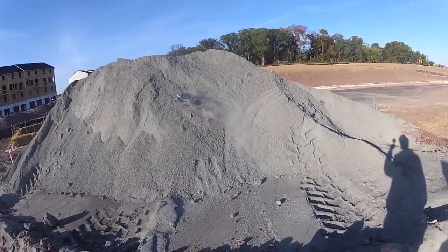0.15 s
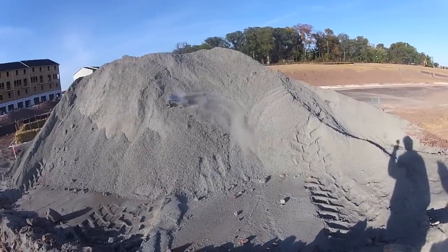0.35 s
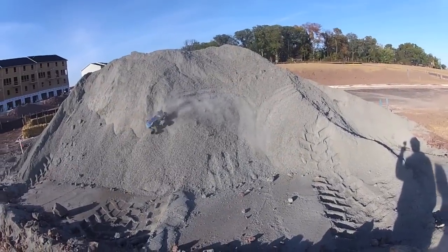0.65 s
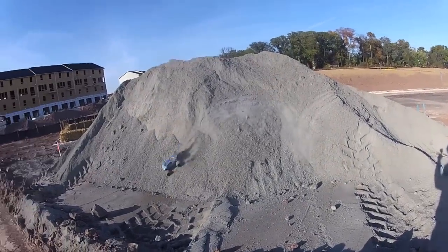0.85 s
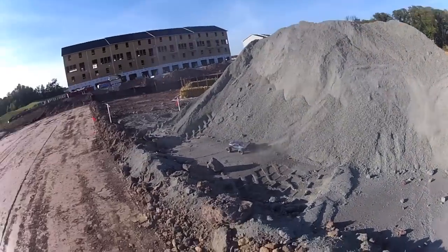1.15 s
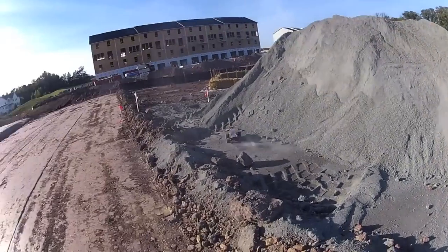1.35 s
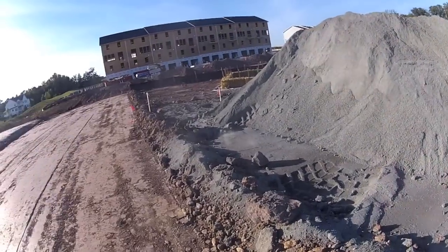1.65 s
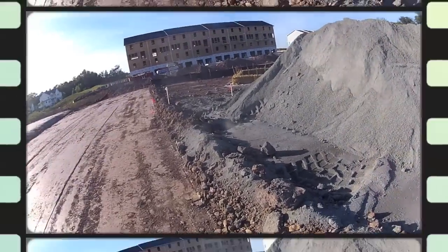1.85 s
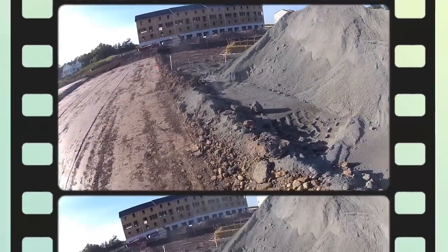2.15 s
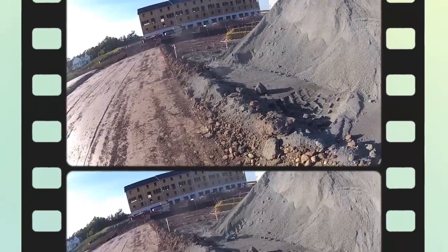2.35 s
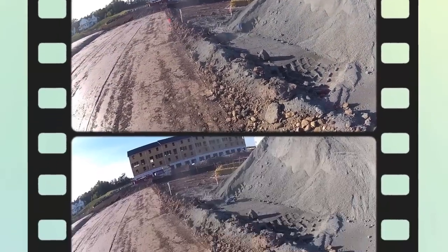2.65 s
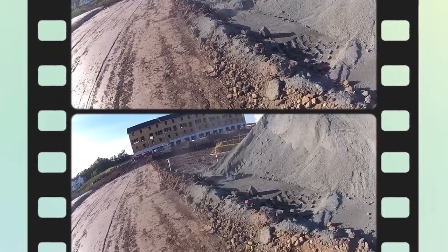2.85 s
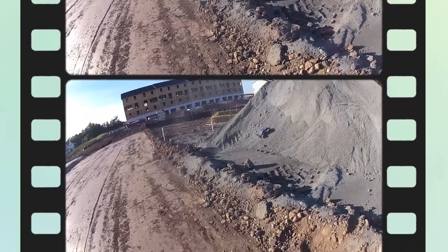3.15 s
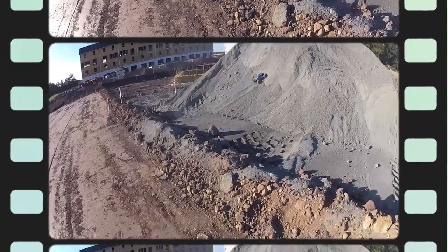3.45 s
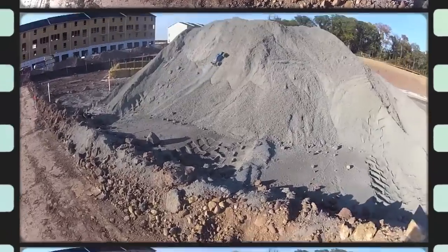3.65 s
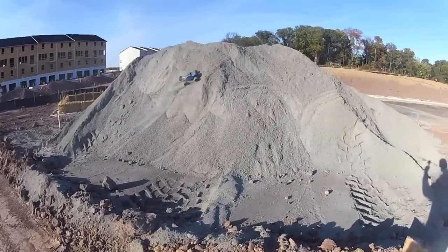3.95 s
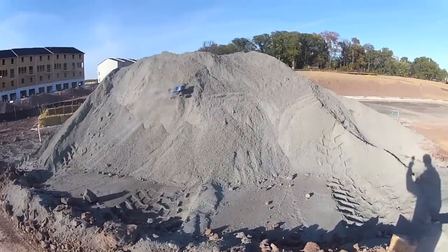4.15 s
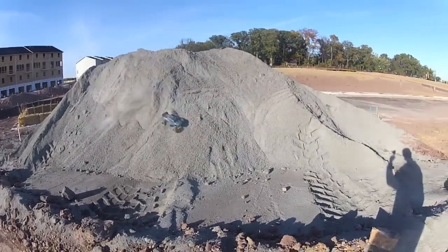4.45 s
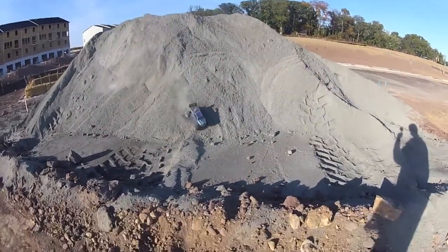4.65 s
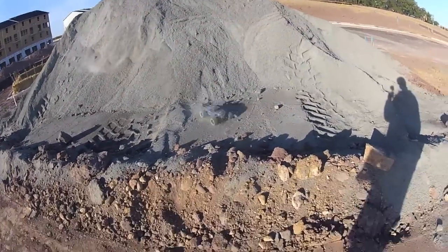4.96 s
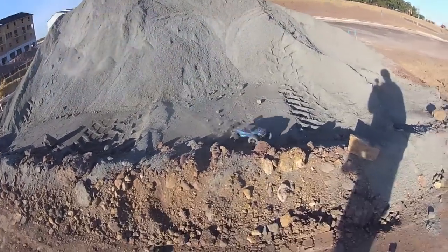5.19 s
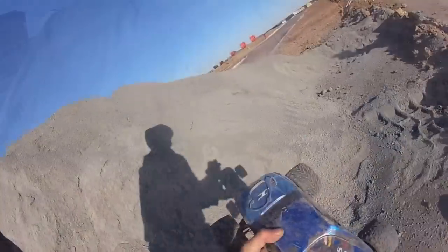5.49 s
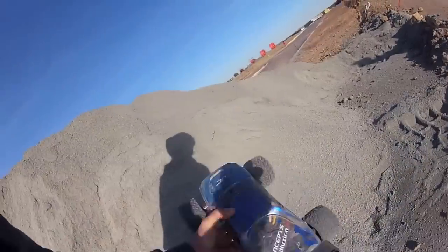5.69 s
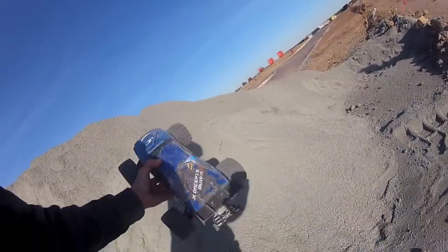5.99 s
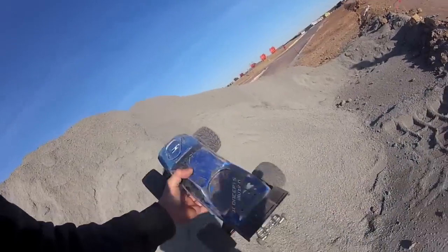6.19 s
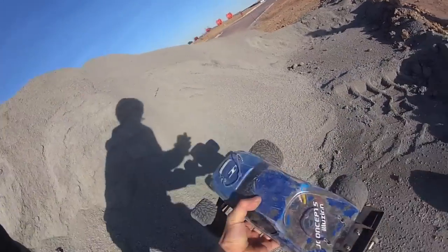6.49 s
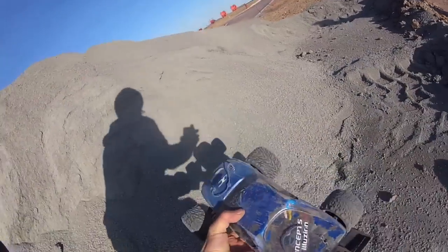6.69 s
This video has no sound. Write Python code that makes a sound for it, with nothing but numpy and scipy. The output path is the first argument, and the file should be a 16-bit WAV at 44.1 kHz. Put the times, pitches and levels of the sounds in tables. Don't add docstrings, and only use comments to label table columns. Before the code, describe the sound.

Thin wavering motor whine and gritty gear rasp outdoors, broken by sharp plastic knocks, a mid-scene fade to silence, then close shell rattles.

```python
import sys
import numpy as np
from scipy import signal
from scipy.fft import rfft, irfft
from scipy.io import wavfile

SR = 44100
rng = np.random.default_rng(int(sys.argv[2]) if len(sys.argv) > 2 else 0)


def master_out(mix):
    frames = np.transpose(np.atleast_2d(mix))
    ceiling = np.clip(frames, -1, 1)
    pcm = np.round(ceiling * 32767).astype(np.int16)
    wavfile.write(sys.argv[1], SR, pcm)


def gain_from_db(level_db):
    decades = np.asarray(level_db, float) / 20
    return 10 ** decades


N = 301203

# t/s, motor level/dB, whine f/Hz, gear load/dB, tyre level/dB
FIRST_RUN = [(0.0, -57, 2200, -11.5, -63.5), (0.5, -60.5, 2270, -8, -63.5), (0.84, -67, 2320, -3.5, -70),
             (1.11, -59, 2250, -9, -68.5), (1.36, -66, 2230, -2.5, -64.5), (1.6, -69.5, 2200, -9, -77),
             (1.88, -76, 2195, -3, -85), (2.14, -65.5, 2200, 3, -63.5), (2.52, -79, 2200, -5, -92)]
# t/s, motor level/dB, whine f/Hz, gear load/dB, tyre level/dB
SECOND_RUN = [(2.949, -68.5, 2250, 1, -64), (3.5, -63, 2260, 4, -67), (3.74, -60.5, 2280, -2.5, -66),
              (4.17, -61, 2290, -5, -66), (4.53, -62.5, 2300, 1, -60), (4.68, -67.5, 2200, -5.5, -72.5),
              (4.92, -71.5, 2247, -0.5, -71), (5.1, -62, 2320, 1.5, -64), (5.33, -65, 2216, -2, -69.5)]
# t/s, motor level/dB, whine f/Hz, gear load/dB, tyre level/dB
IN_HAND = [(5.46, -59.5, 2202, -8, -66), (5.73, -57, 2225, -7, -58.5), (5.92, -59.5, 2200, -7.5, -61.5),
           (6.74, -55.5, 2228, -7.5, -60), (6.83, -55.5, 2175, -10, -62)]
# t/s, motor change/dB, tyre change/dB, length/s
STUMBLES = [(0.737, -6, -3, 0.06), (0.81, 2, 2, 0.045), (0.92, -13, -19, 0.048), (0.998, -7, -6, 0.022),
            (1.016, 6.5, 6, 0.026), (1.062, -4, -1, .04), (1.935, 10.5, 10, 0.032), (2.0, -0.5, 1, 0.066),
            (3.883, 1, 0, 0.044), (4.576, 9, 13.5, 0.019), (4.75, -3, -13, 0.025), (4.776, 2, 15.5, 0.012),
            (4.811, 8.5, 8, 0.044), (4.85, -6, 0, 0.016), (5.04, 2, 3.5, 0.047), (5.146, -0.5, 6.5, 0.048),
            (5.644, 6, 2, 0.028), (6.808, 5, 3, 0.024)]
# start t/s, end t/s, gain/dB
ROUGH_GROUND = [
    (0.0, 0.62, -6),
    (4.1, 4.5, -4),
    (0.86, 0.962, 6),
    (1.224, 1.618, 4.5),
    (1.662, 2.3, 6),
    (3.056, 3.646, 8.5),
    (4.55, 4.6, 11),
    (4.78, 4.947, 9.5),
]
# f/Hz, width/Hz, level/dB
GRIT_PANELS = [(4183, 380, -8), (4670, 1300, -6), (5030, 300, -2.5), (5410, 440, -3), (5910, 280, -6.5)]
# start t/s, end t/s, gain/dB
SQUEEZES = [
    (0.0, 0.6, -3),
    (5.513, 5.816, 6),
    (6.437, 6.83, 6.5),
]
# t/s, peak level/dB, f/Hz, length/s
STONES = [(0.066, -59, 5330, 0.0092), (0.674, -55, 3630, 0.012), (0.7193, -54, 5100, 0.013),
          (1.344, -54, 5360, 0.013), (1.7, -64, 5470, 0.014), (1.92, -49.5, 5270, 0.005),
          (2.074, -53, 5270, 0.016), (2.37, -57, 5500, 0.01), (2.469, -56.5, 5410, 0.0071),
          (3.077, -54, 5350, 0.016), (3.144, -44, 5600, 0.0088), (3.513, -49.5, 3680, 0.012),
          (3.817, -58, 5080, 0.014), (3.8685, -49.5, 5030, 0.0089), (4.227, -53, 3600, 0.011),
          (4.5617, -43.5, 3750, 0.012), (4.596, -47, 5970, 0.015), (4.7704, -43.5, 3520, 0.0089),
          (4.801, -54, 3950, 0.015), (4.8566, -47.5, 5440, 0.01), (5.195, -52, 4980, 0.011),
          (5.2425, -49, 5890, 0.013), (5.281, -48.5, 5900, 0.012), (5.3094, -51.5, 6050, 0.013),
          (6.551, -47.5, 5030, 0.012), (1.248, -58, 4500, 0.013), (1.297, -55, 5600, 0.012),
          (1.462, -60, 5300, 0.01), (2.445, -60, 5500, 0.009)]
# t/s, peak level/dB, f/Hz, length/s
RATTLES = [(0.704, -47, 2240, 0.013), (0.798, -54, 2420, 0.029), (4.5665, -44, 2660, 0.0082),
           (4.799, -44.5, 2605, 0.031), (5.55, -37.5, 2200, 0.01), (5.644, -33.5, 1977, 0.013),
           (5.7284, -37.5, 2005, 0.027), (5.761, -37, 2030, 0.016), (5.875, -39.5, 1960, 0.027),
           (5.946, -39, 2035, 0.016), (6.078, -35.5, 2065, 0.015), (6.151, -38.5, 1986, 0.016),
           (6.3854, -39.5, 2053, 0.017), (6.5543, -40, 2250, 0.013)]
# start t/s, end t/s, level/dB, f/Hz, width/Hz
DRUMMING = [(4.98, 5.22, -68.5, 720, 190), (5.58, 5.72, -67, 824, 220), (1.32, 1.36, -69, 670, 220),
            (0.0, 0.68, -70, 1060, 100), (4.19, 4.56, -70, 3620, 120), (1.02, 1.2, -71, 4700, 500),
            (0.0, 0.5, -70, 5150, 300), (5.6, 6.9, -63, 3000, 1000), (5.68, 5.8, -62, 3600, 250),
            (4.3, 4.55, -72, 1450, 400), (2.76, 2.8, -68, 3050, 100), (6.76, 6.9, -57.5, 180, 125),
            (4.79, 4.84, -62, 1300, 450)]
# t/s, peak level/dB, thump re peak/dB, snap re peak/dB
KNOCKS = [(0.8152, -56.5, 14.5, -10), (0.928, -48, 2, -1.5), (2.205, -46.5, 0, 0.5),
          (2.2786, -26.5, 10, 9.5), (2.296, -34, 4.5, -8), (2.309, -39, 2, -5.5), (2.319, -36.5, 4, -2.5),
          (3.926, -38.5, -10, -5), (3.98, -39.5, 3, -10), (4, -10.5, -5, -12.5), (4.0088, -33, -18, 2.5),
          (4.037, -26, 1, -16.5), (4.680, -47, 0, -2), (4.696, -47, -20, -1), (4.7015, -15.5, -4, -10.5)]
# t/s, level/dB
RUB = [(2.268, -73), (2.275, -52), (2.284, -38), (2.296, -50), (2.315, -55), (2.328, -63), (2.345, -76.5)]
# f/Hz, level/dB, t60/s
WALL_MODES = [(662, -17.5, 0.044), (1000, -7, 0.0052), (1070, -3.5, 0.027), (1275, -14, 0.036),
              (1570, -9, 0.0074), (1770, -4, 0.0082)]
# f/Hz, level/dB, t60/s
SNAP_MODES = [(1840, -11, 0.012), (2200, 7.5, 0.0094), (2765, -10.5, .01), (3245, -7.5, 0.0053),
              (3494, -6.5, 0.027), (4540, -27.5, .006), (5080, -20.5, 0.0033)]
# f/Hz, level/dB, t60/s
THUMP_MODES = [(117, -6.5, 0.043), (205, 3.5, 0.017)]
# t/s, buffeting level/dB
WIND = [(0.0, -62.5), (0.83, -64), (1.12, -57.5), (1.45, -66.5), (1.97, -69.5), (2.25, -53), (2.38, -65.5),
        (2.6, -66), (3.0, -67), (3.4, -63), (3.75, -58), (4.35, -61.5), (4.74, -56), (5.08, -63),
        (5.5, -69.5), (6.7, -62), (6.83, -55)]
# f/Hz, level per Hz/dB
RUSH = [(60, -0.5), (150, 1), (300, -2), (450, -7), (700, -11), (1500, -18.5), (3000, -22.5), (6000, -21)]
# f/Hz, level per Hz/dB
SIDE_HISS = [(15, -29.5), (25, 9), (2210, -16), (4800, -16), (5900, -33), (7670, -62.5), (13000, -120)]

CUT_S, LIFTED_S, LIFT_S = 2.838, 5.36, 0.1


def whirr():
    level_db, whine_hz, load_db, _, lifted = drive()
    flutter_db = 1.2 * drift(27)
    running = np.arange(N) / SR < LIFTED_S

    jittered_hz = whine_hz + 55 * drift(45)
    tone = np.sqrt(2) * np.sin(2 * np.pi * np.cumsum(jittered_hz) / SR)
    whine = gain_from_db(-8.0) * running * tone
    whine = whine + gain_from_db(-2.5) * band_around(whine_hz, width_hz=240, per_s=4000, spread_db=4.5)
    whine = whine + gain_from_db(-12) * band_around(whine_hz, width_hz=480, per_s=4000, spread_db=6.0)

    mesh_hz = 2661 + 6.0 * load_db + 30.0 * drift(3.3)
    mesh_db = level_db + load_db + 0.4 * drift(5.2)
    mesh = band_around(mesh_hz, width_hz=237, per_s=3700, spread_db=0.5)
    mesh = mesh + gain_from_db(-5.5) * twice(grains(2500, 3.3), 2970, 210)

    chassis_db = level_db - 8.5 + 0.4 * load_db + 12.5 * lifted
    chassis_db = chassis_db + sum(db * spell(start, end) for start, end, db in ROUGH_GROUND)
    chassis_db = chassis_db + 1.7 * drift(8) + 0.45
    chassis = twice(grains(4000, 3.4), 1980, 340) + gain_from_db(-4.5) * twice(grains(4000, 1.7), 1783, 270)

    return gain_from_db(flutter_db) * (gain_from_db(level_db + 0.9) * whine + gain_from_db(mesh_db) * mesh + gain_from_db(chassis_db) * chassis)


def drive():
    t = np.arange(N) / SR
    before_cut = np.arange(N) < CUT_S * SR
    course = np.where(before_cut, in_time(FIRST_RUN), in_time(SECOND_RUN + IN_HAND))
    motor_db, whine_hz, load_db, tyres_db = course
    for s, motor_change_db, tyres_change_db, length_s in STUMBLES:
        bump = np.clip(1 - np.abs(t - s) / max(length_s, 0.005), 0, 1)
        motor_db = motor_db + motor_change_db * bump
        tyres_db = tyres_db + tyres_change_db * bump
    lifted = np.clip((t - LIFTED_S) / LIFT_S, 0, 1)
    return motor_db, whine_hz, load_db, tyres_db, lifted


def gravel():
    motor_db, _, _, grit_db, lifted = drive()
    excess_db = motor_db - grit_db
    crunch_db = 1.2 * drift(35)

    grit = sum(gain_from_db(db) * twice(grains(4000, 3.8), hz, width_hz) for hz, width_hz, db in GRIT_PANELS)
    grit_level_db = grit_db + crunch_db + 1.2 * drift(19) + 0.5

    high_hz = 3645 + 50.0 * drift(6.0)
    high = band_around(high_hz, width_hz=270, per_s=3000, spread_db=3.0)
    high = high + gain_from_db(-4) * twice(grains(3000, 3.0), 3500, 1200)
    high_db = grit_db - 4.5 + 0.2 * excess_db - 1.0 * lifted
    high_db = high_db + crunch_db + 1.5 * drift(4.0) - 1.8

    low = twice(grains(1500, 1.1), 1044, 110)
    low = low + gain_from_db(-3.5) * twice(grains(1400, 4.2), 930, 330)
    low = low + gain_from_db(-3) * twice(grains(1500, 1.8), 1380, 180)
    low_db = grit_db - 6.5 + 0.5 * excess_db - 4.5 * lifted
    low_db = low_db + sum(db * spell(start, end) for start, end, db in SQUEEZES)
    low_db = low_db + 0.67 * drift(12) - 2.5

    return gain_from_db(grit_level_db) * rms_one(grit) + gain_from_db(high_db) * high + gain_from_db(low_db) * low


def stones():
    return bursts(STONES, width_hz=900, gain_db=3.0)


def rattles():
    return bursts(RATTLES, width_hz=670, gain_db=-2.5)


def drumming():
    return sum(gain_from_db(db) * spell(start, end) * twice(grains(1500, 3.2), hz, width_hz)
               for start, end, db, hz, width_hz in DRUMMING)


def knocks():
    s, peak_db, thump_db, snap_db = np.transpose(KNOCKS)
    at = ((s + 0.0012) * SR).astype(int)
    body, snap, thump = np.zeros((3, N))
    body[at] = -gain_from_db(peak_db + 0.5)
    snap[at + 12] = -gain_from_db(peak_db + snap_db - 11.5)
    thump[at] = -0.35 * gain_from_db(peak_db + thump_db)
    thump[at + int(0.0028 * SR)] = 0.76 * gain_from_db(peak_db + thump_db)

    crackle = np.exp(-np.arange(400) / SR / 0.0022)
    snap = snap + 0.28 * signal.fftconvolve(snap, crackle)[:N] * grains(3400, 1.4)
    near_rub = np.abs(np.arange(N) / SR - 2.3) < 0.05
    drag = gain_from_db(in_time(RUB)[0] + 5.5) * near_rub * grains(2500, 0.83)
    body = body + gain_from_db(-11.5) * drag
    snap = snap + gain_from_db(-24) * drag

    soft = signal.windows.hann(int(0.00082 * SR))
    heavy = signal.windows.hann(int(0.00085 * SR))
    wall = ring(np.convolve(body, soft / soft.sum())[:N], WALL_MODES)
    wall = signal.sosfilt(signal.butter(2, 520, "high", fs=SR, output="sos"), wall)
    swing = ring(np.convolve(thump, heavy / heavy.sum())[:N], THUMP_MODES)
    swing = signal.sosfilt(signal.butter(2, 55, "high", fs=SR, output="sos"), swing)
    return wall + ring(snap, SNAP_MODES) + swing


def wind():
    buffet_db, = in_time(WIND)
    rush_db = -63 + 0.15 * (buffet_db + 63.5)
    band = signal.butter(2, [18, 75], "band", fs=SR, output="sos")
    buffet = rms_one(signal.sosfilt(band, rng.standard_normal(N)))
    rush = coloured(RUSH, floor_hz=55)
    return gain_from_db(buffet_db + 2.0 * drift(2) - 1.0) * buffet + gain_from_db(rush_db + 0.76 * drift(10) + 3.0) * rush


def amplifier_hiss():
    return gain_from_db(-80) * coloured(SIDE_HISS, floor_hz=20)


def edit_fade():
    t = np.arange(N) / SR - CUT_S
    fade_s = np.where(t < 0, 0.94, 0.93)
    return np.clip((np.abs(t) - 0.004) / fade_s, 0, 1) ** 1.01


def bursts(events, width_hz, gain_db):
    out, noise = np.zeros(N), grains(9000, 4.6)
    for s, peak_db, hz, length_s in events:
        at = int(s * SR)
        t = np.arange(int(0.06 * SR)) / SR / max(length_s, 0.002)
        t = t[:N - at]
        scrape = twice(noise[at:at + len(t)] * t * np.exp(-3 * t), hz, width_hz)
        out[at:at + len(t)] += gain_from_db(peak_db + gain_db) * scrape / np.abs(scrape).max()
    return out


def band_around(hz, width_hz, per_s, spread_db):
    low = signal.butter(4, width_hz / 2, fs=SR, output="sos")
    pair = signal.sosfilt(low, [grains(per_s, spread_db), grains(per_s, spread_db)])
    phase = 2 * np.pi * np.cumsum(hz) / SR
    return rms_one(pair[0] * np.cos(phase) + pair[1] * np.sin(phase))


def grains(per_s, spread_db):
    sizes = gain_from_db(spread_db * np.minimum(rng.exponential(1, N), 4)) * rng.choice([-1, 1], N)
    return rms_one(sizes * (rng.random(N) < per_s / SR))


def ring(clicks, modes):
    out = 0
    for hz, level_db, t60_s in modes:
        r = gain_from_db(-60 / (t60_s * SR))
        w = 2 * np.pi * hz / SR
        numerator = [0, gain_from_db(level_db) * np.sin(w)]
        out = out + signal.lfilter(numerator, [1, -2 * r * np.cos(w), r * r], clicks + 1e-18)
    return out


def resonate(x, hz, width_hz):
    r = np.exp(-np.pi * width_hz / SR)
    numerator = np.array([1, 0, -1]) * (1 - r * r) / 2
    return signal.lfilter(numerator, [1, -2 * r * np.cos(2 * np.pi * hz / SR), r * r], x)


def twice(x, hz, width_hz):
    return rms_one(resonate(resonate(x, hz, width_hz), hz, width_hz))


def coloured(spectrum, floor_hz):
    hz = np.fft.rfftfreq(N, 1 / SR) + 1
    corner_hz, level_db = np.transpose(spectrum)
    colour = gain_from_db(np.interp(np.log(hz), np.log(corner_hz), level_db))
    return rms_one(irfft(rfft(rng.standard_normal(N)) * colour * (hz > floor_hz), N))


def drift(rate):
    r = np.exp(-80 * np.pi * rate / SR)
    slow = signal.lfilter([1], [1, -2 * r, r * r], rng.standard_normal(N // 40 + 2002))[2000:]
    return np.interp(np.arange(N) / 40, np.arange(len(slow)), rms_one(slow))


def spell(start, end):
    t = np.arange(N) / SR
    return np.clip(np.minimum(t - start, end - t) / 0.068 + 0.5, 0, 1)


def in_time(rows):
    s, *columns = np.transpose(rows)
    return [np.interp(np.arange(N) / SR, s, c) for c in columns]


def rms_one(x):
    return x / np.sqrt(np.mean(x ** 2) + 1e-20)


def scene():
    mono = whirr() + gravel() + stones() + rattles() + drumming() + knocks() + wind()
    fade = edit_fade()
    mono = mono * fade
    side = amplifier_hiss() * fade
    return np.array([mono + side, mono - side])


def top_cut(x):
    return signal.sosfilt(signal.butter(12, 16500, fs=SR, output="sos"), x)


def record(dry):
    slow = signal.resample_poly(dry, 40, 147, axis=1)
    held = signal.resample_poly(np.repeat(slow, 4, axis=1), 147, 160, axis=1)[:, 1:N + 1]
    held = np.pad(held, ((0, 0), (0, N - held.shape[1])))
    kept = signal.sosfiltfilt(signal.cheby2(12, 30, 15600, fs=SR, output="sos"), held)
    loudness = np.clip(np.abs(held) / 0.05, 0, 1)
    mix = kept + gain_from_db(-26.5) * loudness * (held - kept)
    return top_cut(mix)


dry = scene()
out = record(dry)
master_out(out)
```